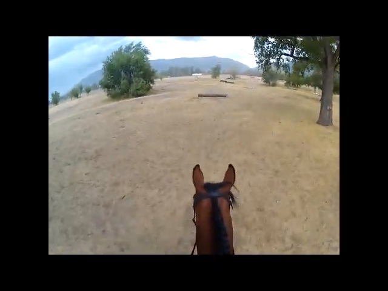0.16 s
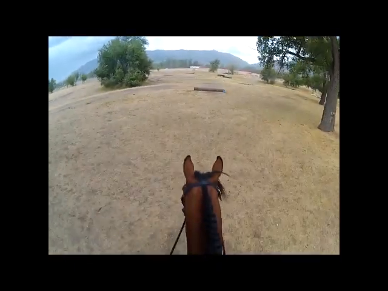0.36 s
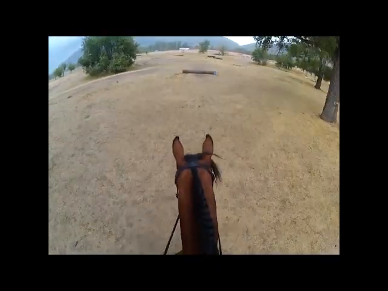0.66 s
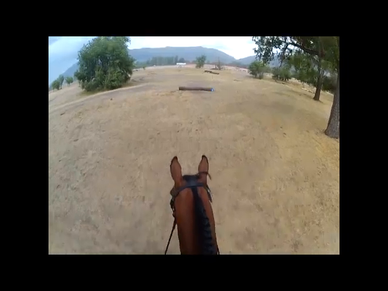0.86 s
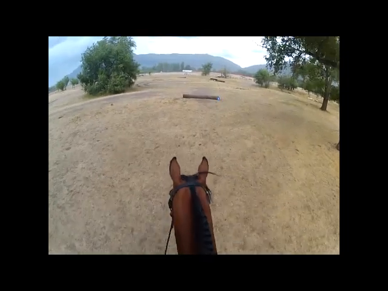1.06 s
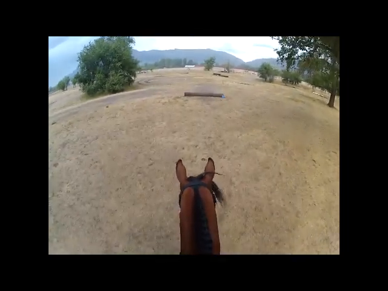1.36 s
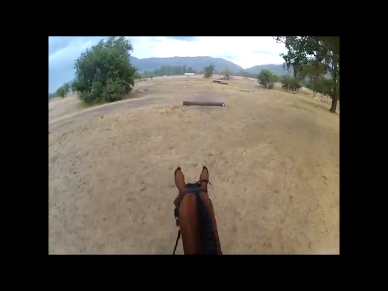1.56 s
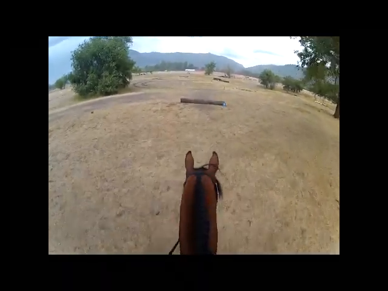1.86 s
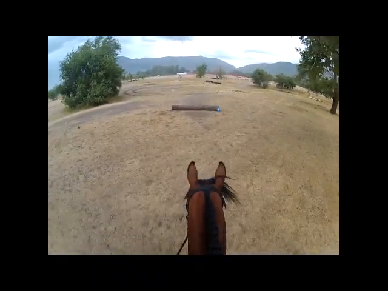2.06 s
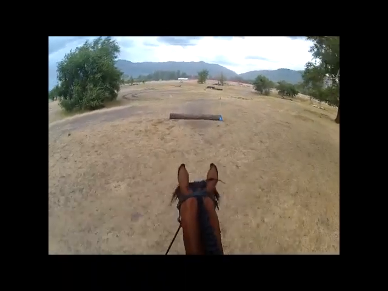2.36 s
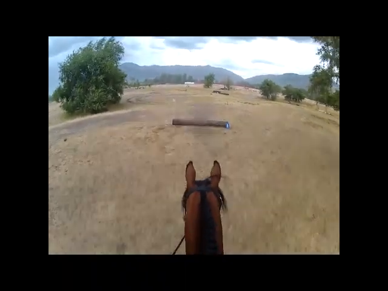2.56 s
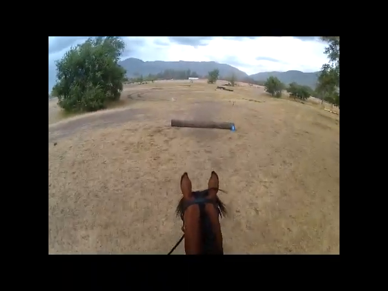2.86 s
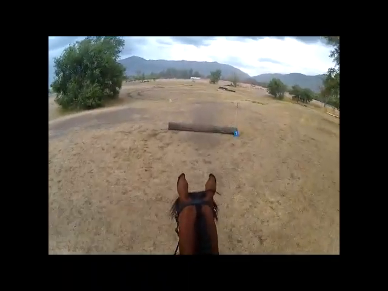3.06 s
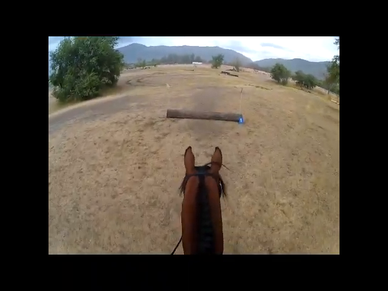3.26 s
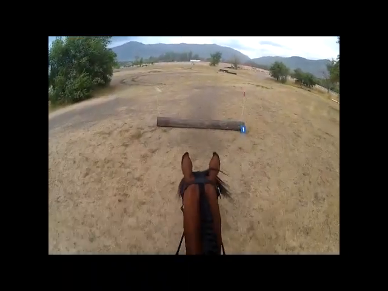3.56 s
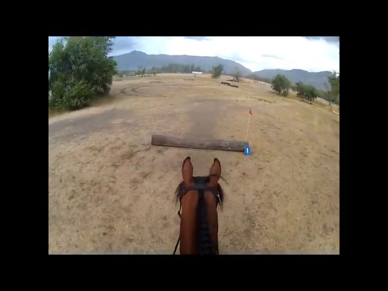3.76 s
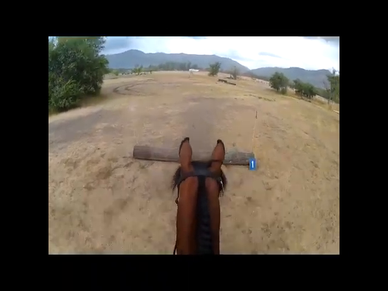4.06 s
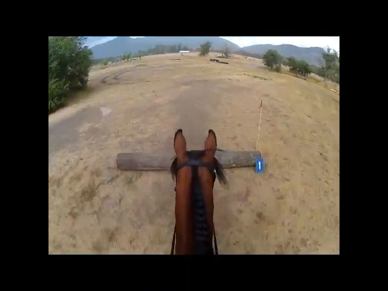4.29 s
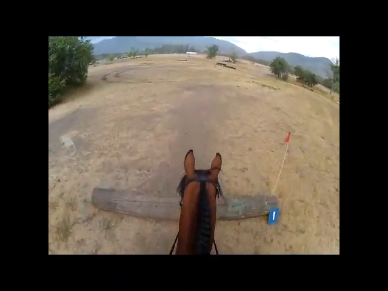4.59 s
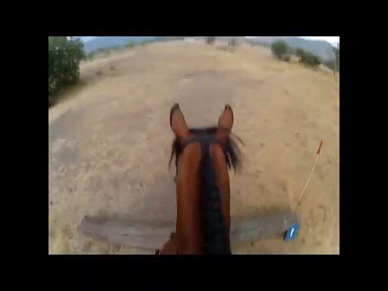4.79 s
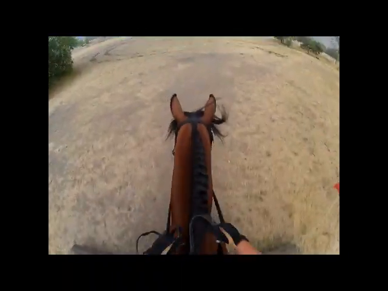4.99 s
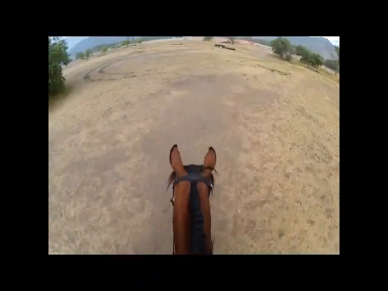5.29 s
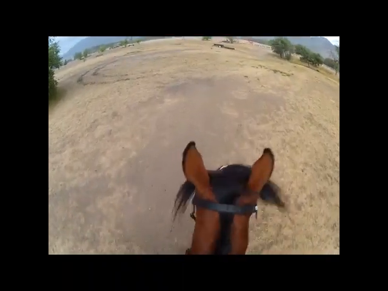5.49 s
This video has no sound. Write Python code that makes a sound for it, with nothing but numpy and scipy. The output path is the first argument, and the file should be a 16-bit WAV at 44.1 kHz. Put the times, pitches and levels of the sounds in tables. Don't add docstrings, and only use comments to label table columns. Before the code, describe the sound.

A horse canters across dry open ground and jumps a log, heard through a cased camera on the rider's helmet. Muffled low wind rumbles throughout, gusting slightly, with a barely audible thin whine. The start is quiet with faint ticks; at 0.5 s a double hollow plastic knock lands with a deep thud. More boxy knocks and thumps follow at 1.25 and 1.9 s. At 2.5-2.7 s comes a loud, clattering cluster, with cracking case panels and a scratchy strap rub. A weak knock near 3.0 s, then a hard double clack at 3.3 s. A calmer gap holds small touches before another strong knock at 4.07 s. From 4.7 to 5.0 s the jump brings dense rattling, harsh rubbing and the heaviest low thumps. A further thud comes at 5.2 s, a small metallic buckle clink at 5.38 s, then wind swells at the end. Dull, narrow, close sound.

```python
import sys
import numpy as np
from scipy import signal
from scipy.fft import rfft, irfft, next_fast_len
from scipy.io import wavfile
from scipy.ndimage import uniform_filter1d

SR = 44100
rng = np.random.default_rng(int(sys.argv[2]) if len(sys.argv) > 2 else 0)


def transcribe(u):
    v = np.clip(np.atleast_2d(u).T, -1, 1)
    q = np.round(v * 32767).astype(np.int16)
    wavfile.write(sys.argv[1], SR, q)


def ratio(d):
    e = np.asarray(d, float) / 20
    return 10 ** e


N = 248283

# (pitch [Hz], level [dB])
WHINE_TONES = [
    (5040, -86),
    (5088, -86),
    (4992, -96),
    (5184, -100),
]
# (frequency [Hz], level [dB per Hz])
WIND_SPECTRUM = [(35, -19.5), (56, 1), (90, -16), (231, -19), (520, -30.5), (874, -32.5), (1360, -37.5),
                 (2330, -37), (4760, -43.5), (5140, -41), (6000, -41), (7800, -87), (13200, -120)]
# (time [s], level [dB])
GUSTS = [(0.0, 3), (0.3, -1), (0.9, -1.5), (1.8, -1), (2.35, -1.5), (2.5, 2), (3.04, 1), (3.4, -5),
         (3.75, 0), (4.3, 1.5), (4.75, 1.5), (5.05, 1), (5.35, -1.5), (5.63, 8)]
# (time [s], level [dB], hold [s])
FOOTFALLS = [(0.0, -33, 0.01), (0.242, -30.5, 0.005), (0.294, -37.5, .015), (0.128, -46, 0.013),
             (0.405, -42.5, 0.0057), (0.717, -42, 0.0063), (0.87, -41, 0.0078), (3.868, -51.5, .01),
             (0.547, -21, 0.047), (0.92, -28, .005), (0.963, -34.5, .025), (1.25, -20.5, 0.031),
             (1.604, -31.5, .01), (1.925, -22.5, 0.059), (2.267, -29, 0.067), (2.633, -16.5, 0.037),
             (2.985, -27.5, 0.04), (3.329, -21, 0.03), (3.42, -23.5, 0.013), (3.696, -33.5, 0.071),
             (3.773, -34.5, .01), (4.049, -23, 0.05), (4.124, -26.5, .015), (4.398, -34, .02),
             (4.482, -28.5, .02), (4.598, -38.5, 0.017), (4.742, -25, .01), (4.891, -20.5, 0.033),
             (5.083, -27.5, 0.036), (5.23, -22.5, 0.012), (5.377, -36.5, 0.024), (5.514, -43, 0.0097),
             (5.62, -37, .01)]
# (time [s], peak [dB], pitch [Hz])
LURCHES = [(0.244, -33, 67.4), (0.538, -19.5, 67.5), (0.57, -10.5, 71), (0.923, -35, 63.6),
           (1.222, -38, 64), (1.276, -14, 70), (1.622, -23.5, 59), (1.899, -19.5, 74), (1.948, -12, 68.3),
           (2.309, -42, 60), (2.51, -14, 70.6), (2.609, -16.5, 73.4), (2.656, -25, 76), (2.696, -11.5, 69),
           (2.989, -46, 66), (3.308, -29.5, 78.2), (3.363, -23.5, 74.4), (3.416, -30.5, 67.7),
           (3.749, -34.5, 64.4), (4.074, -15, 69.6), (4.387, -30, 62.3), (4.429, -33.5, 57.4),
           (4.502, -30.5, 67), (4.727, -28.5, 65.5), (4.81, -13, 74.5), (4.904, -6, 70.4),
           (4.972, -24.5, 70), (5.123, -46.5, 67), (5.218, -15, 69.4), (5.41, -31.5, 60.3)]
# (time [s], peak [dB], pitch [Hz])
JOLTS = [(0.234, -37.5, 99), (0.599, -24.5, 137), (0.608, -28, 102), (0.922, -38, 113), (1.216, -40.5, 170),
         (1.262, -23, 149), (1.294, -23, 103), (1.617, -37, 99), (1.984, -48, 107), (2.095, -33.5, 144),
         (2.526, -23.5, 117.4), (2.543, -35, 95), (2.633, -16, 80), (2.652, -10.5, 156),
         (3.336, -25.5, 109), (3.372, -27, 113), (3.408, -21.5, 128.7), (3.726, -31.5, 140),
         (4.031, -24, 110), (4.051, -23.5, 98), (4.114, -20.5, 107), (4.402, -31.5, 157.7),
         (4.713, -28.5, 118), (4.829, -11.5, 114), (4.877, -14, 160), (4.906, -40, 91), (4.948, -32, 100),
         (4.978, -28, 144), (5.211, -11.5, 134), (5.243, -31, 107)]
# (time [s], peak [dB], pitch [Hz])
LOW_THUMPS = [(0.604, -22, 85), (0.925, -41, 91), (1.283, -31, 190), (1.885, -36, 190), (1.893, -39.5, 400),
              (1.963, -55, 420), (1.979, -24.5, 84.4), (2.512, -42, 400), (2.653, -12.5, 86),
              (2.693, -25.5, 370), (2.98, -44, 423), (3.01, -50, 169), (3.053, -45.5, 190), (3.31, -19, 95),
              (3.332, -30, 170), (3.411, -36, 84), (3.46, -55, 100), (4.11, -16.5, 86), (4.159, -36, 80),
              (4.46, -42, 177.6), (4.856, -25, 161), (4.897, -40, 400), (4.908, -24, 176), (4.929, -38, 170),
              (4.976, -47, 420), (5.01, -37, 85), (5.076, -42, 85), (5.098, -37, 85.5), (5.196, -47, 378),
              (5.26, -51, 190), (5.285, -43.5, 190), (5.614, -45.5, 420)]
# (time [s], peak [dB], pitch [Hz])
BUMPS = [(1.246, -33.5, 290), (2.083, -41, 228), (2.677, -14.5, 228), (4.491, -41, 127), (4.575, -59, 300),
         (4.721, -27.5, 480), (4.804, -20, 201), (5.09, -38, 486), (5.093, -49, 208), (5.2, -41, 327),
         (5.08, -39.5, 120), (5.617, -37.5, 211)]
# (time [s], level [dB], length [s], cavity re walls [dB])
RUBS = [(0.467, -64, 0.11, -1), (0.576, -50.5, 0.046, 1.5), (0.875, -65, 0.1, -1),
        (1.175, -59, 0.068, -2.5), (1.265, -49, 0.034, 4), (1.871, -55.5, 0.04, 3.5),
        (1.956, -51.5, 0.041, 1.5), (2.287, -71, 0.15, -10), (2.592, -50.5, 0.025, 9),
        (2.645, -52, 0.014, 17), (2.669, -35, 0.026, 8), (2.96, -56, 0.047, -1), (3.025, -59.5, 0.035, -15),
        (3.27, -63.5, 0.091, 3), (3.34, -58, 0.038, 1), (3.377, -51, 0.047, 2), (3.453, -70.5, 0.12, 3.5),
        (3.707, -64, 0.053, 2), (4.0, -59.5, 0.035, -0.5), (4.088, -50.5, 0.03, 1.5), (4.115, -76, 0.08, 3),
        (4.372, -65.5, 0.14, 0), (0.21, -64.5, 0.079, 1), (1.006, -73, 0.05, -9), (2.041, -62, 0.023, 1),
        (5.153, -67.5, 0.045, 6), (5.242, -64.5, 0.024, 6), (5.559, -59.5, 0.047, -3)]
# (time [s], level [dB], length [s], cavity re walls [dB], fizz re walls [dB])
DRAGS = [(0.517, -53, 0.014, -4, -16), (2.558, -64, 0.043, 2, -16), (2.662, -54.5, 0.0123, -5, -14),
         (4.775, -53.5, 0.032, -6, -7), (4.797, -30.5, 0.029, 5, -12), (4.828, -52.5, 0.066, 5.5, -6),
         (4.874, -41, 0.034, -1.5, -1), (4.9, -48, 0.027, -1, -2), (4.93, -57, 0.034, -5, -22),
         (4.97, -60.5, 0.06, -2.5, -8), (5.05, -65, 0.037, -6, -12), (5.203, -50.5, 0.039, 1, -3.5)]
# (pitch [Hz], width [Hz], level [dB])
RUB_WALL_MODES = [
    (2102, 800, 5.5),
    (3900, 890, -0.5),
    (1639, 400, -2),
]
# (pitch [Hz], width [Hz], level [dB])
BUCKLE_MODES = [
    (1922, 74, 9.5),
    (2760, 280, -6.5),
    (3470, 280, 2),
    (5240, 500, -48),
]
# (time [s], peak [dB])
CLINKS = [
    (5.378, -23),
    (5.388, -35.5),
]
# (time [s], peak [dB], cavity [Hz], sharpness [dB], jolt of the mount [dB])
KNOCKS = [(0.512, -15.5, 922, -16.5, -17.5), (0.56, -14, 908, -11.5, -9.5), (1.243, -14, 913, -9.5, -14),
          (1.895, -39.5, 834, -11, -26.5), (1.935, -13, 1065, -14, -8.5), (1.972, -29, 756, -47, -22),
          (2.082, -35, 860, -24, -22.5), (2.498, -5, 903, -16, -9), (2.513, -16.5, 882, -19.5, -15),
          (2.589, -18.5, 877, -32, -21), (2.643, -18.5, 937, -7, -19.5), (2.673, -19.5, 855, -37, -14),
          (2.681, -14.5, 842, -17, -18.5), (2.691, -26.5, 1270, -15, -9.5), (2.983, -33.5, 916, -37, -21.5),
          (3.305, -7.5, 927, -18.5, -14.5), (3.349, -14.5, 1050, -11.5, -12), (4.065, -8, 932, -16, -12.5),
          (4.101, -23, 850, -38, -23.5), (4.719, -19.5, 990, -29, -20.5), (4.793, -14.5, 855, -35, -23.5),
          (4.801, -20, 890, -18, -25), (4.809, -19, 1000, -1, -32), (5.196, -35.5, 935, -13, -19.5)]
# (time [s], peak [dB], cavity [Hz], sharpness [dB])
TICKS = [(0.148, -59, 847, 4), (0.596, -34.5, 810, -19), (1.085, -67.5, 972, 15), (1.283, -32.5, 840, -33),
         (2.363, -54.5, 910, -8), (2.972, -38.5, 747, -28), (3.066, -65, 910, 13), (3.322, -48, 796, -3),
         (3.476, -53.5, 830, 1), (3.734, -57, 890, 6), (3.775, -59, 824, 9.5), (3.853, -50, 1127, 0.5),
         (3.883, -63, 1025, 14.5), (3.961, -68.5, 806, 6.5), (4.222, -63.5, 987, 15), (4.399, -51, 838, -3),
         (4.454, -58, 806, 10.5), (4.575, -54.5, 860, -24), (4.815, -26.5, 834, -1), (4.938, -54, 1250, 7),
         (4.974, -49, 870, -7), (5.087, -37.5, 940, -15), (5.381, -46.5, 910, 12), (5.39, -47.5, 910, 6),
         (5.55, -51, 1200, 9)]
# (time [s], peak [dB], cavity [Hz], sharpness [dB], jolt of the mount [dB])
FURTHER_KNOCKS = [(0.526, -59, 900, 10, -50), (0.586, -49, 920, 2, -39), (2.603, -34, 900, -18, -33),
                  (2.648, -20, 860, -17, -30), (2.662, -56, 900, -3, -38), (3.403, -46, 885, -12, -48),
                  (3.726, -54, 905, -10, -47), (4.812, -27, 943, 2.5, -32), (4.824, -22, 954, -11, -27),
                  (4.866, -43, 810, 0, -45), (4.881, -43, 800, 3, -41.5), (4.908, -43, 890, -6, -40),
                  (5.229, -54, 920, 8, -38)]
# (time [s], peak [dB], pitch [Hz])
PANELS = [(0.5135, -43, 2260), (0.5606, -20, 2020), (0.5608, -28, 2900), (1.2445, -43, 2960),
          (1.2445, -27, 1350), (1.9368, -34, 2520), (2.4988, -17.5, 1340), (2.4988, -31, 3570),
          (2.4992, -40.5, 5630), (2.4995, -29.5, 2920), (2.5145, -35.5, 1400), (2.6436, -21.5, 1250),
          (2.645, -36, 2800), (2.676, -35, 2250), (2.694, -34, 1500), (2.984, -56, 1350),
          (3.3065, -18.5, 1770), (3.35, -25.5, 1300), (4.066, -25, 1680), (4.066, -28.5, 2830),
          (4.72, -36.5, 1900), (4.811, -23, 2800), (4.818, -19, 2300), (4.889, -40, 3300),
          (4.895, -30, 3200), (1.9365, -33, 3700), (2.4985, -29.5, 2450), (4.813, -41, 4200),
          (4.885, -42, 4300), (4.904, -47, 2600), (4.913, -45.5, 3900)]
# (pitch [Hz], width [Hz], level [dB])
WALL_MODES = [
    (1707, 480, 0.5),
    (2500, 450, -2),
]
# (pitch [Hz], width [Hz], level [dB])
EDGE_MODES = [
    (2740, 190, 1),
    (3635, 320, 1.5),
    (5000, 730, -12.5),
]
CATCHES = [1.9396, 2.4996, 2.515, 3.3528, 4.7208, 5.1964]


def evened(x):
    return x / np.sqrt(np.mean(x ** 2) + 1e-20)


def peaked(x, peak_db):
    return ratio(peak_db) * x / abs(x).max()


def add(mix, s, sound):
    part = mix[max(round(s * SR), 0):][:len(sound)]
    part += sound[:len(part)]


def resonate(x, hz, width_hz):
    r = np.exp(-np.pi * width_hz / SR)
    c = r * np.cos(2 * np.pi * hz / SR)
    return 2 * (1 - r) * signal.lfilter([1, -c], [1, -2 * c, r * r], x)


def ring(x, modes, tune=1):
    return sum((-1) ** k * ratio(db) * resonate(x, hz * tune, width_hz)
               for k, (hz, width_hz, db) in enumerate(modes))


def slow(hz):
    size = next_fast_len(N)
    f = np.fft.rfftfreq(size, 1 / SR)
    spectrum = rfft(rng.standard_normal(size)) * np.exp(-(f / hz) ** 2)
    return evened(irfft(spectrum, size)[:N])


def whine():
    t = np.arange(N) / SR
    return sum(ratio(db + 6.5) * np.sin(2 * np.pi * hz * t) for hz, db in WHINE_TONES)


def rocking_db(rise_db_per_s=326, fall_db_per_s=223.5, still_db=-52.5):
    t = np.arange(N) / SR
    level = np.full(N, float(still_db))
    for s, db, hold_s in FOOTFALLS:
        before_s = np.maximum(s - t, 0)
        after_s = np.maximum(t - s - hold_s, 0)
        level = np.maximum(level, db - rise_db_per_s * before_s - fall_db_per_s * after_s)
    return level


def wind(level_db=-54, patchy_db=2.0, reach_hz=900, shake_from_db=-42.5):
    frames, hz = N // 256 + 5, np.fft.rfftfreq(1024, 1 / SR)
    real, imag, patches = rng.standard_normal((frames, 513, 3)).T
    patches = uniform_filter1d(patches, size=14, axis=0)
    patches = evened(uniform_filter1d(patches, size=8, axis=1))

    t = np.arange(frames) * 256 / SR
    gust = np.interp(t, *np.transpose(GUSTS))
    rocking = np.interp(t, np.arange(N) / SR, rocking_db())
    shake = uniform_filter1d(np.maximum(rocking - shake_from_db, 0), size=20)
    roar_db = gust + 0.35 * shake
    rustle_db = 0.53 * gust + 0.28 * shake

    low = np.exp(-hz / reach_hz)[:, None]
    mid = np.exp(-((hz - 2600) / 1500) ** 2)[:, None]
    f, level = np.transpose(WIND_SPECTRUM)
    colour_db = np.interp(np.log(hz + 1), np.log(f + 1), level)[:, None]
    gain = ratio(colour_db + patchy_db * patches + roar_db * low + rustle_db * mid)
    air = signal.istft((real + 1j * imag) * gain, nperseg=1024, noverlap=768)[1][:N]
    return ratio(level_db) * evened(air)


def sway(hz=34, width_hz=14, steady=0.32):
    size = next_fast_len(N)
    f = np.fft.fftfreq(size, 1 / SR)
    band = np.exp(-.5 * ((f - hz) / width_hz) ** 2)
    rocking = np.fft.ifft(np.fft.fft(rng.standard_normal(size)) * band)[:N]
    rocking /= abs(rocking) ** steady
    return ratio(rocking_db()) * evened(resonate(rocking.real, hz, 91))


def pushes(table, rise_turns, fall_turns, phases=(np.pi / 3, np.pi)):
    out, t = np.zeros(N), np.arange(-2600, 2600) / SR
    chance = phases[0] + (phases[1] - phases[0]) * rng.random(len(table))
    for (s, db, hz), phase in zip(table, chance):
        turns = t * hz
        swell = np.exp(-.5 * (turns / np.where(t < 0, rise_turns, fall_turns)) ** 2)
        add(out, s + t[0], ratio(db) * swell * np.cos(2 * np.pi * turns + phase))
    return out


def low_thumps():
    return pushes(LOW_THUMPS, 0.57, 0.57)


def thuds():
    knocked = [(s + 0.002, jolt_db, 123.6) for s, *_, jolt_db in KNOCKS]
    mount = pushes(knocked, 0.17, 0.48, phases=(-1.1, -.3)) + pushes(JOLTS, 0.17, 0.52)
    return mount + pushes(BUMPS, 0.24, 0.81) + ratio(-1.5) * pushes(LURCHES, 0.43, 0.39)


def rubs(slips_per_s=3000, spread_db=1.5, ragged_db=3.0):
    size = ratio(spread_db * np.minimum(rng.exponential(1, N), 3.5))
    slips = size * (rng.random(N) < slips_per_s / SR) * rng.choice([-1, 1], N)
    slips = (evened(slips) + 0.31 * rng.standard_normal(N)) * ratio(ragged_db * slow(90))
    walls = ring(ring(slips, RUB_WALL_MODES), RUB_WALL_MODES)
    cavity = resonate(resonate(slips, 913, 450), 1200, 580)
    fizz = resonate(resonate(slips, 5000, 4400), 6500, 1900)

    skids = [(s + 0.0023, db - 50, 0.013, 19.5) for s, db, *_ in KNOCKS]
    leads = [(s - 0.0089, db - 52, 0.0089, 4.5) for s, db, *_ in KNOCKS]
    usual = [(*row, -9 - 0.17 * row[-1]) for row in RUBS + skids + leads]
    shapes = [(0.22, 0.64, 0.17)] * len(usual) + [(0.18, 0.8, 0.13)] * len(DRAGS)

    out = np.zeros(N)
    for (s, db, length_s, cavity_db, fizz_db), (rise, hold, fall) in zip(usual + DRAGS, shapes):
        t = np.arange(0, length_s + 0.013, 1 / SR)
        grip = np.minimum(t / (rise * length_s), 1)
        grip = grip * np.exp(-np.maximum(t - hold * length_s, 0) / (fall * length_s))
        part = slice(round(s * SR), round(s * SR) + len(t))
        rub = evened(walls[part]) + ratio(cavity_db - 3.5) * evened(cavity[part])
        rub = rub + ratio(fizz_db) * evened(fizz[part])
        add(out, s, ratio(db) * rub * grip[:len(rub)])
    return out


def buckle():
    out, t = np.zeros(N), np.arange(1300) / SR
    for (s, db), noise in zip(CLINKS, rng.standard_normal((len(CLINKS), len(t)))):
        add(out, s, peaked(ring(noise * np.exp(-t / 0.0016), BUCKLE_MODES), db))
    return out


def panels():
    return pushes(PANELS, 0.7, 3.1)


def loose(s, t, die_s=0.00079):
    grips = [c - s for c in CATCHES if 0 < c - s < .005]
    return np.exp(-np.maximum(t - min(grips, default=1), 0) / die_s)


def strikes():
    return KNOCKS + [(*row, row[1] + 13) for row in TICKS]


def knocks(rows, swell=1.61, tau_s=0.00092, crest_hz=900, stiff=0.17):
    out, t = np.zeros(N), np.arange(1300) / SR
    chatter = rng.standard_normal((len(rows), len(t)))
    tunes = rng.uniform(0.935, 1.04, len(rows))
    shove = resonate(resonate(resonate(1. * (t == 0), 260, 200), 240, 258.3), 329.3, 240)
    size = peaked((t / tau_s) ** swell * np.exp(-t / tau_s), 0)
    sagging = t + stiff * 0.0012 * (1 - np.exp(-t / 0.00057))

    for (s, db, hz, sharp_db, jolt_db), noise, tune in zip(rows, chatter, tunes):
        start_s = s - .0005
        near_hz = hz if abs(hz - crest_hz) < 60 else crest_hz
        turn = 2 * np.pi * hz * sagging + np.pi / 2
        crest = 2 * np.pi * near_hz * sagging + np.pi / 2
        cavity = size * loose(start_s, t) * (np.cos(turn) + 0.78 * np.cos(crest))
        cavity = cavity + 0.044 * evened(resonate(noise, hz, 350)) * np.exp(-t / 0.0061)

        shake = noise * (size ** 1.2 + 0.043 * np.exp(-t / 0.011))
        scratch = resonate(resonate(shake, 2000, 1100), 2110, 860)
        walls = peaked(ring(ring(shake, WALL_MODES, tune), WALL_MODES, tune), -1.2)
        walls = walls + size ** 4.5 * np.cos(2 * crest)
        edges = peaked(ring(ring(shake, EDGE_MODES, tune), EDGE_MODES, tune), -0.65)
        edges = edges + size ** 0.57 * (.5 * np.cos(3 * crest) + 0.35 * np.cos(4 * crest))

        knock = peaked(cavity, db + 1.5) + peaked(scratch, db + sharp_db)
        knock = knock + peaked(walls, db - 3.5 + 0.4 * sharp_db) + peaked(edges, db + sharp_db - 5.5)
        add(out, start_s, knock + peaked(shove, jolt_db - 15.5))
    return out


def scene():
    ride = thuds() + knocks(strikes()) + sway() + rubs() + buckle()
    background = wind() + whine()
    extras = low_thumps() + knocks(FURTHER_KNOCKS) + panels()
    return (ride + background + extras)[None]


def low_pass(x):
    return signal.sosfilt(signal.butter(12, 12460, fs=SR, output="sos"), x)


def record(dry):
    steep = ("kaiser", 5)
    soft = .95 * np.tanh(dry / .95)
    guard = signal.firwin(45, 5550, window=("kaiser", 4), fs=SR)
    clean = signal.oaconvolve(soft, guard[None], "same")
    sampled = signal.resample_poly(clean, 40, 147, axis=1, window=steep)
    held = np.repeat(sampled, 4, axis=1)
    steps = signal.resample_poly(held, 147, 160, axis=1, window=steep)[:, :N]
    edge = signal.firwin(255, 11960, window=("kaiser", 8), fs=SR)
    mix = signal.oaconvolve(steps, edge[None], "same")
    return low_pass(mix)


dry = scene()
out = record(dry)
transcribe(out)
```